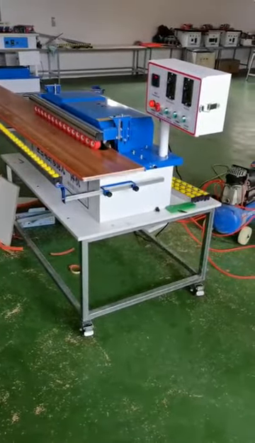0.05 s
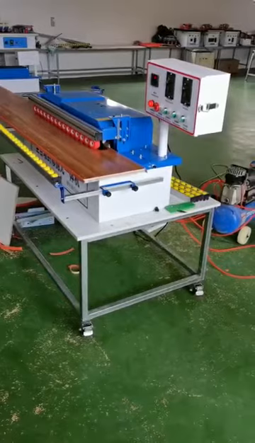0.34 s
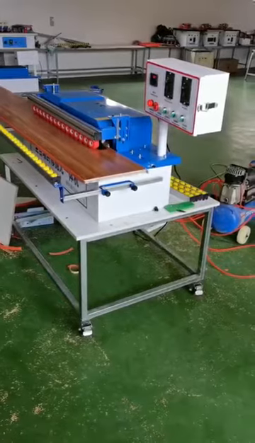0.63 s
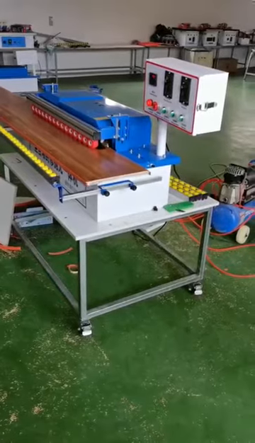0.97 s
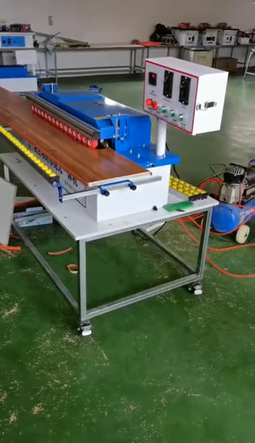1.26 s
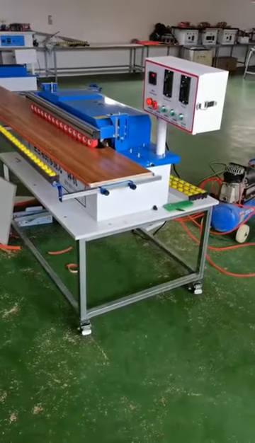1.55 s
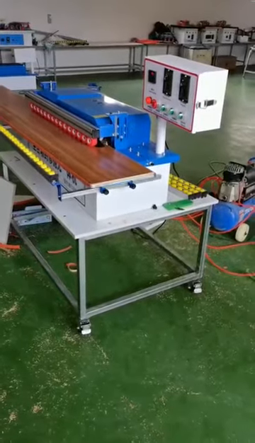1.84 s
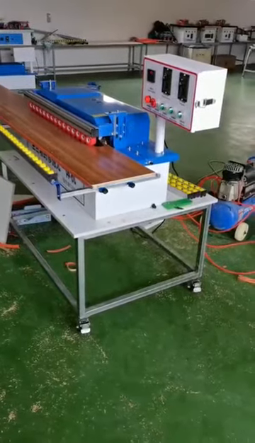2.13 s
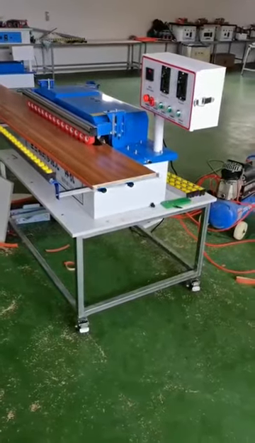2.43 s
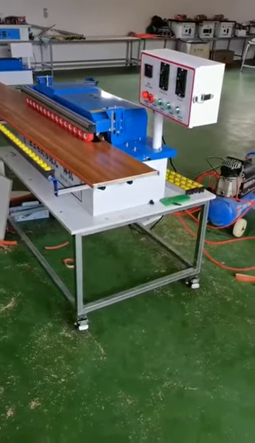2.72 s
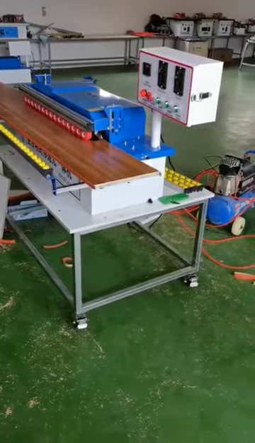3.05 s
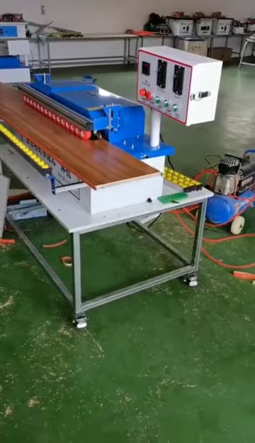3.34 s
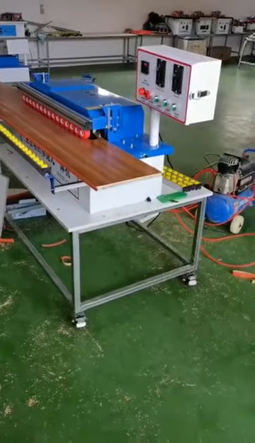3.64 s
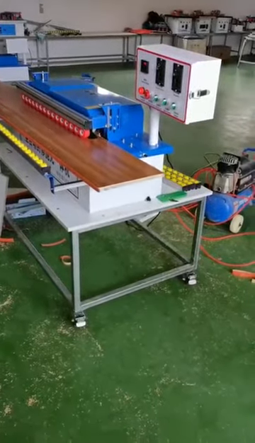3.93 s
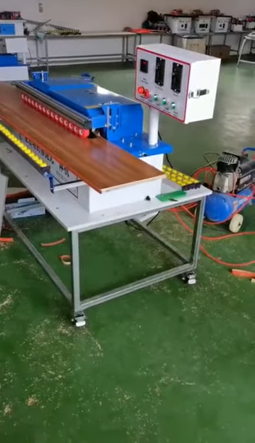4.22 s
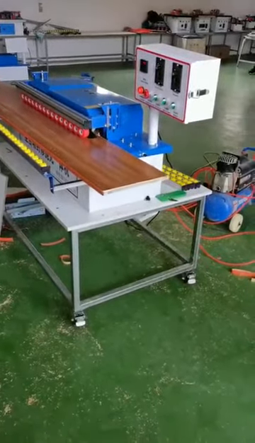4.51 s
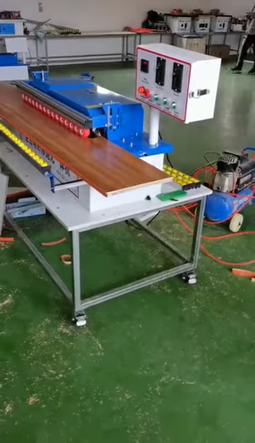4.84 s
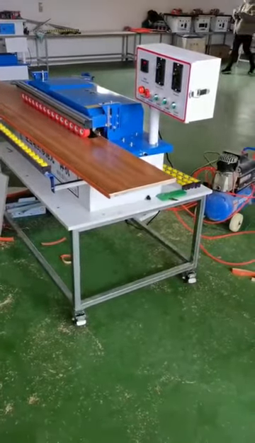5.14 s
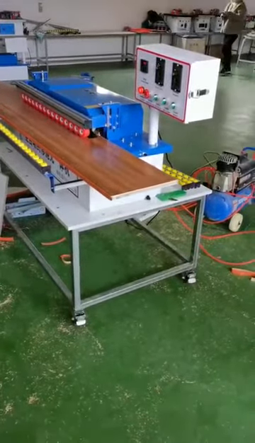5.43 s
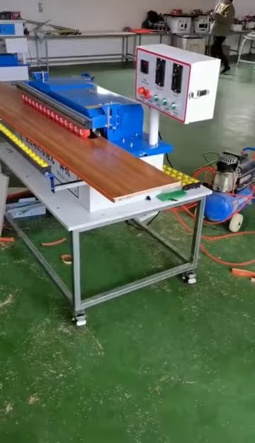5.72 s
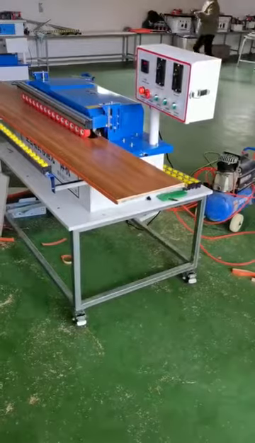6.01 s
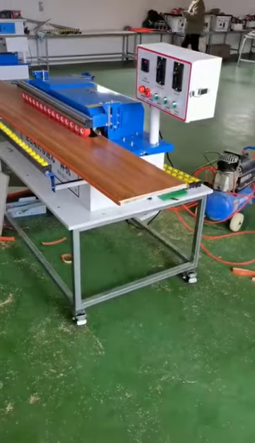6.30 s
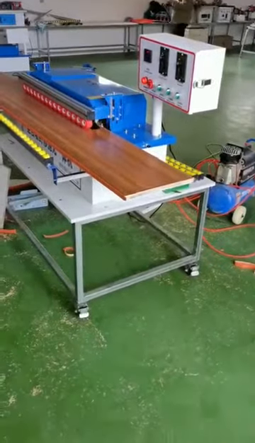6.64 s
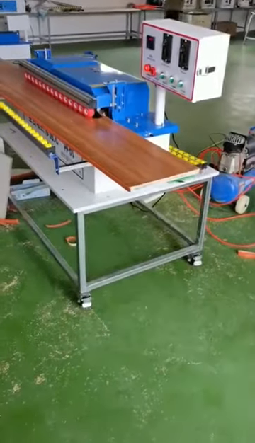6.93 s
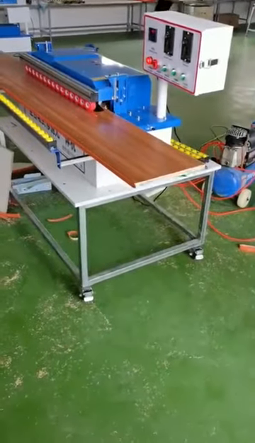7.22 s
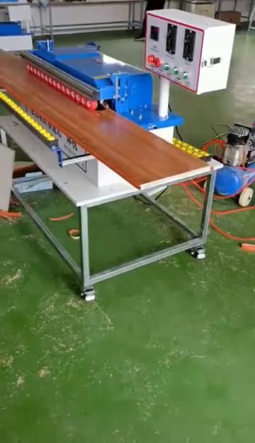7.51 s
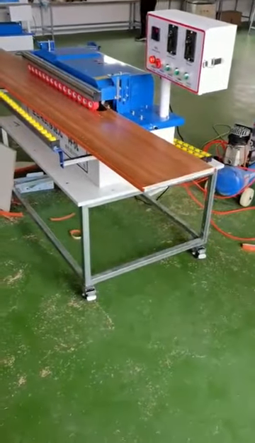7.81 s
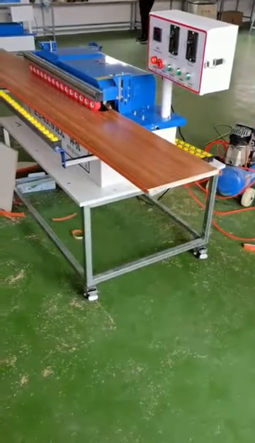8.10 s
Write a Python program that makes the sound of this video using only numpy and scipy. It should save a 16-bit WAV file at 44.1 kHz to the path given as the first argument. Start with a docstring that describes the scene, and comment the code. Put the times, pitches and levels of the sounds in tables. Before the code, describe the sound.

An edge banding machine runs throughout in a hard-walled workshop, heard from a hand-held phone. Two trimmer spindles whine at nearly the same pitch, beating against each other, with overtones that briefly swell and shift. From the start, one rasps along a wooden panel's edge, with a patchy hiss of chips and a rumble from the panel. Underneath, a low feed drone deepens and grows over the first 1.5 seconds, easing briefly between about 2 and 2.7 seconds. Around 4.5 to 4.8 seconds the whine sags in pitch under load, then partly recovers. Near 5.7 seconds the panel leaves the knives with a soft boom, and the rasp and feed drone fade away. The idling spindles keep whining with rushing cooling air and a slightly stronger electrical hum, swelling a little from 7 seconds to the end at about 8 seconds.

```python
"""Edge banding machine in a hard-walled workshop.

Two trimmer spindles whine and beat against each other, heard from a hand-held phone. One rasps along
a panel's edge, throwing chips, while the feed drones under load. The panel leaves the knives with a
soft boom near 5.7 s; idling spindles, cooling air and mains hum remain."""
import sys
import numpy as np
from scipy import signal
from scipy.fft import rfft, irfft, next_fast_len
from scipy.io import wavfile
from scipy.ndimage import uniform_filter1d

SR = 44100
rng = np.random.default_rng(int(sys.argv[2]) if len(sys.argv) > 2 else 0)


def persist_wave(psi):
    """Save psi, clipped to +-1, as 16-bit WAV."""
    counts = np.round(np.clip(psi, -1, 1) * 32767).astype(np.int16)
    wavfile.write(sys.argv[1], SR, np.atleast_2d(counts).T)


N = 359856
TIME = np.arange(N) / SR
STEP = 32  # samples per control step
SLOW_TIME = np.arange(N // STEP + 2) * STEP / SR
CUT_END_S, TOP_HZ = 5.72, 7680
SIDES, PORT_SPAN_S = np.array([[1], [-1]]), 0.00043  # left and right microphone ports

# Shaft speeds, sagging at peak load near 4.7 s.
# Each row: time in seconds, cutting trimmer in Hz, light trimmer in Hz.
SPEEDS = [(0, 393.3, 413.5), (.65, 390.5, 408), (1.6, 392.3, 407), (2.2, 395.6, 408), (2.9, 393.6, 410),
          (3.5, 390, 412.2), (4.08, 391.5, 413), (4.5, 380.5, 398), (4.75, 378, 395), (5.2, 385.5, 399.3),
          (5.55, 383.5, 400), (6.05, 388.7, 402.5), (7, 385, 400.2), (7.7, 385.8, 400),
          (8.16, 388.3, 402.5)]


def undb(db):
    """Decibels to gain."""
    return np.exp(np.asarray(db) * (np.log(10) / 20))


def curves(table):
    """Table columns, interpolated linearly in time."""
    times_s, *columns = np.transpose(table)
    return [np.interp(TIME, times_s, column) for column in columns]


def until(end_s, fade_s):
    """Smooth step from 1 to 0."""
    return .5 - .5 * np.tanh((TIME - end_s) / fade_s)


def blend(busy_db, idle_db, share):
    """Gain between working (share 1) and idling (share 0)."""
    return undb(share * busy_db + (1 - share) * idle_db)


def pan(db):
    """Port gains for a left-minus-right level."""
    gains = undb(SIDES * db / 2)
    return gains / np.sqrt(np.mean(gains ** 2, axis=0))


def drift(width_hz):
    """Smooth complex random motion: unit power, control rate."""
    count = len(SLOW_TIME)
    size = next_fast_len(count)
    hz = np.arange(size // 2 + 1) * SR / STEP / size
    spectrum = rfft(rng.standard_normal((2, size))) / (1 + (hz / width_hz) ** 2)
    real, imag = irfft(spectrum, size)[:, :count]
    return (real + 1j * imag) / np.sqrt(np.mean(real ** 2 + imag ** 2))


def swirl(width_hz):
    """Drift at the sample rate."""
    return np.interp(TIME, SLOW_TIME, drift(width_hz))


def walk(width_hz):
    """Real drift of unit spread."""
    return np.sqrt(2) * swirl(width_hz).real


def noise(colour, db, direct, pan_db, peaks=(), left_lead_s=0.00017):
    """Coloured noise: the direct part reaches the left port first, the hall comes from all sides."""
    size = next_fast_len(N)
    hz = np.arange(size // 2 + 1) * SR / size + 1e-3
    colour_hz, colour_db = np.transpose(colour)
    shape_db = np.interp(np.log(hz), np.log(colour_hz), colour_db)
    shape_db += sum(peak_db / (1 + (2 * (hz - centre_hz) / width_hz) ** 2)
                    for centre_hz, width_hz, peak_db in peaks)
    straight, mid, side = rfft(rng.standard_normal((3, size))) * undb(shape_db) * (hz < TOP_HZ)
    coherence = np.sinc(2 * hz * PORT_SPAN_S)
    hall = mid * np.sqrt((1 + coherence) / 2) + SIDES * side * np.sqrt((1 - coherence) / 2)
    lead = np.exp(1j * np.pi * hz * left_lead_s * SIDES)
    ports = irfft(hall + direct * straight * lead, size)[:, :N]
    return ports * undb(db) / np.std(ports) * pan(pan_db)


def mottle(sound, depth_db, width_hz, length_s):
    """Narrow bands of the noise swell and sink at random, giving a patchy, shifting texture."""
    size = 1024
    _, _, spectra = signal.stft(sound, nperseg=size)
    field = rng.standard_normal(spectra.shape[1:])
    for axis, span in enumerate((width_hz * size / SR, 2 * length_s * SR / size)):
        span = max(round(span), 1)
        field = uniform_filter1d(uniform_filter1d(field, span, axis=axis), span, axis=axis)
    gain = undb(depth_db * field / field.std())
    return signal.istft(spectra * gain / np.sqrt(np.mean(gain ** 2)), nperseg=size)[1][:, :N]


def idle_swell_db(start_s=7.08, db_per_s=2.5):
    """Late, steady rise in the level of the idling sounds."""
    return db_per_s * np.maximum(TIME - start_s, 0)


def knife_bite_db(surge_db=0.56, surge_hz=7.2):
    """Bite about its mean in the cut, surging as the grain varies."""
    # Each row: time in seconds, relative bite in dB.
    bite = [(0, -32.0), (0.17, -33.5), (0.45, -29), (0.8, -31.5), (1.2, -29), (1.55, -32.5), (2.08, -34),
            (2.55, -29.5), (3.0, -29), (3.45, -28.5), (3.8, -29.5), (4.2, -32), (4.55, -30), (5.05, -32),
            (5.62, -29.5)]
    db, = curves(bite)
    return db - db[TIME < CUT_END_S].mean() + surge_db * walk(surge_hz)


def shaft_order(turn, order, shaft_hz, sway, sway_hz, fray, swell=0, fray_hz=24, left_lead_s=0.00015):
    """One frayed shaft harmonic; standing waves shift its balance as the phone sways."""
    # Brief swells of single harmonics in the whine.
    # Each row: centre in seconds, half-width in seconds, order, lift in dB at swell=1.
    swells = [(0.223, 0.23, 4, 12.5), (1.25, .18, 5, 0.5), (2.304, 0.13, 4, 8), (2.56, 0.026, 3, 6),
              (2.72, 0.072, 4, 5.5), (3.254, 0.043, 3, 12.5), (3.45, 0.14, 5, 5.5), (3.936, 0.26, 4, 1),
              (4.45, .2, 6, 4.5), (4.728, 0.083, 4, 7), (5.1, 0.4, 5, 6.5), (5.9, .15, 6, 23),
              (6.52, .16, 4, 11), (7.2, 0.19, 4, 8.5), (7.97, .2, 4, 11)]
    hz = order * shaft_hz
    spread = np.sqrt(1 - np.sinc(2 * hz * PORT_SPAN_S))
    imbalance = sway * spread * drift(sway_hz)
    lead = np.exp(1j * np.pi * hz * left_lead_s * SIDES)
    line = (1 + SIDES * imbalance) * lead / np.sqrt(1 + abs(imbalance) ** 2)
    # The skirts reverberate, so they differ between ports.
    skirts = fray * (drift(fray_hz) + SIDES * spread * drift(fray_hz)) / np.sqrt(1 + spread ** 2)
    swell_db = swell * sum(db * np.exp(-((SLOW_TIME - at_s) / half_s) ** 2)
                           for at_s, half_s, on_order, db in swells if on_order == order)
    envelope = (line * undb(swell_db) + skirts * undb(swell_db / 2)) * np.sqrt(2 / (1 + fray ** 2))
    carrier = np.exp(1j * (order * turn + rng.uniform(0, 2 * np.pi)))
    return np.array([(np.interp(TIME, SLOW_TIME, port) * carrier).real for port in envelope])


def cutting_trimmer(turn, other_turn, load, bite_db, beat=0.38, panel_loose_s=5.165):
    """Unequal knives rasp and fray the upper orders; the other spindle shakes the same panel."""
    # Unbalance tone radiated by the clamped panel. Each row: time in seconds, relative level in dB.
    unbalance = [(0, -25.5), (0.8, -21.5), (1.08, -23.5), (1.3, -16.5), (1.6, -19.5), (2.5, -13),
                 (2.75, -16), (3.05, -12), (3.32, -20), (3.7, -10.5), (4.13, -20), (4.25, -17),
                 (4.34, -24.5), (4.44, -15), (5.05, -19)]
    # Its balance as the phone settles in standing waves. Each row: time in seconds, left minus right in dB.
    unbalance_pan = [(0, -5.5), (0.42, 11.5), (0.7, -17.5), (1.15, 1.5), (1.6, 0.0), (1.9, -4.0), (5, -3.5)]
    # Second order in the cut. Each row: time in seconds, relative level in dB.
    second_order = [(0, -22.5), (0.55, -15), (1.2, -19), (2.05, -30.5), (2.52, -36.5), (2.65, -24.5),
                    (3.35, -26), (4.5, -26), (4.8, -23.5), (5.6, -35)]
    # Rasp. Each row: shaft order, then relative dB in mid-panel, towards the panel end and idling.
    rasp_orders = [(3, -2.5, -7.5, -6), (5, 0.5, -2.5, -0.5), (6, -2.5, -3.5, -12), (7, -8, -9, -24),
                   (8, -14.5, -10.5, 2), (9, -18.5, -34, -26), (10, -24.5, -27, -19),
                   (11, -19.5, -18.5, -19), (12, -37, -33, -8.5), (16, -45, -39.5, -12)]
    # Knife chatter, settling as the spindle bogs down, then idles. Each row: time in seconds, share 0-1.
    chatter_shares = [(0, 0.88), (3.9, 0.86), (4.5, 0.54), (5.5, 0.54), (5.9, 0.35)]
    shaft_hz = curves(SPEEDS)[0]
    first_db, = curves(unbalance)
    pan_db, = curves(unbalance_pan)
    second_db, = curves(second_order)
    orders = [(1, blend(first_db - 0.86, -36.5, until(panel_loose_s, 0.078)) * pan(pan_db)),
              (2, blend(second_db - 0.2, -42, load) * pan(0.92)),
              (4, blend(-27 + 1.1 * bite_db, -39, until(panel_loose_s, 0.31)) * pan(-5.5))]  # knife tone
    ease_db = np.interp(TIME, [1.3, 3.0], [0, -6])
    strain_db = 0.27 * np.maximum(382.4 - shaft_hz, 0)  # harder rasp as the spindle bogs down
    rasp = blend(-21.5 + ease_db + strain_db + 1.62 * bite_db, -40 + idle_swell_db(), load)
    for order, middle_db, end_db, idle_db in rasp_orders:
        stage_db = np.interp(TIME, [1.5, 3.3, 5.5, 5.9], [middle_db, end_db, end_db, idle_db])
        orders.append((order, rasp * undb(stage_db) * pan(-2)))
    chatter = np.interp(SLOW_TIME, *np.transpose(chatter_shares))
    whine = 0
    for order, gain in orders:
        height = min(order / 4, 1)
        shake = beat * height ** 2 * load * np.cos(other_turn - turn + rng.uniform(0, 2 * np.pi))
        fray = (0.28 + .125 * (min(order, 8) - 1) * height) * chatter
        tone = shaft_order(turn, order, shaft_hz.mean(), sway=.5 * height, sway_hz=3.6, fray=fray, swell=1)
        whine += gain * (1 + shake) * tone
    return whine


def light_trimmer(turn, other_turn, load):
    """A steadier whine; the shared frame adds a tone at the sum of both shaft speeds."""
    # Upper harmonics. Each row: shaft order, base level in dB.
    upper_orders = [(3, -46.5), (6, -39), (8, -45), (16, -48)]
    shaft_hz = curves(SPEEDS)[1]
    mean_hz = shaft_hz.mean()
    orders = [(1, undb(-32) * pan(-5)), (2, undb(-41)), (4, undb(-37))]
    orders += [(order, undb(db)) for order, db in upper_orders]
    whine = sum(gain * shaft_order(turn, order, mean_hz, sway=0.88, sway_hz=1, fray=0.18 * order, swell=0.24)
                for order, gain in orders)
    load_db = load * (1.3 - np.maximum(395.8 - shaft_hz, 0))  # dips 1 dB per Hz in the deepest sag
    frame_db = -37.5
    contact = np.interp(TIME, [0, 2.4, 4, 5.7], undb([-32.5, 6, 4, 1]))
    frame = shaft_order(turn + other_turn, 1, 2 * mean_hz, sway=0.77, sway_hz=0.41, fray=1)
    return whine * undb(load_db + idle_swell_db()) + undb(frame_db) * contact * frame


def chips_and_panel(turn, load, bite_db, pulsing=0.29):
    """Chips hiss off the knives each turn while panel and hood rumble; the texture is patchy."""
    # Noise spectra. Each row: frequency in Hz, relative density in dB.
    chip_colour = [(900, -45.5), (1400, -0.5), (1800, 3.5), (2200, 4.5), (2500, -6.5), (3000, -35),
                   (3500, 0.5), (4300, -14), (5000, -9.5), (5600, -16), (6600, -9), (7600, -22.5)]
    panel_colour = [(25, -3), (45, -11.5), (85, 0), (130, -8.5), (270, -15.5), (400, 3.5), (490, -9.5),
                    (640, -8.5), (900, -8.5), (1080, 4), (1350, -2), (2000, -10), (4000, -33.5)]
    # Hood and guide resonances. Each row: centre in Hz, width in Hz, gain in dB.
    hood = [(542, 18, 4.5), (738, 27, 8.5), (870, 75, 11.5), (1070, 62, 1.5), (1510, 20, -4),
            (1740, 100, 0.5), (2480, 16, 7), (3250, 160, -17), (3740, 41, 7), (4043, 92, 10), (4100, 42, 6),
            (4526, 47, 13.5), (5200, 59, -7), (5030, 65, 6.5), (6470, 170, -14.5), (7420, 90, 14.5)]
    chips = noise(chip_colour, -26, direct=0.29, pan_db=-1, peaks=hood)
    chips *= 1 + pulsing * (np.cos(turn) + np.cos(2 * turn))
    panel = noise(panel_colour, -29.5, direct=0.5, pan_db=-5.5, peaks=hood)
    cut = chips * undb(1.53 * bite_db) + panel * undb(0.93 * bite_db)
    return load * mottle(cut, depth_db=2.6, width_hz=130, length_s=.06)


def feed_drive(rough=0.55, rough_hz=9, rise_db_per_s=3.5, full_s=1.5, free_s=5.62):
    """The drone slows and grows as the drive takes the panel, then fades as it runs free."""
    # Each row: time in seconds, drone pitch in Hz.
    pitch = [(0, 57.5), (.8, 55.5), (.92, 51.2), (1.33, 51), (1.6, 45.7), (3.5, 45.6), (5.3, 49.2)]
    hz, = curves(pitch)
    slack = until(2.73, .06) - until(1.91, .04)  # briefly runs light
    db = -36.5 + rise_db_per_s * np.minimum(TIME, full_s) - 9.5 * slack
    drone = np.exp(2j * np.pi * np.cumsum(hz) / SR) * (1 + rough * swirl(rough_hz))
    return np.sqrt(2) * drone.real * undb(db) * until(free_s, .2)


def mains_hum(load, idle_lift_db=5):
    """Motors and heater hum, louder after the cut."""
    # Each row: frequency in Hz, base level in dB.
    harmonics = [(50, -52), (100, -69.5), (200, -40.5), (300, -58), (500, -62), (600, -57)]
    waver = undb(.6 * walk(2.5))
    hum = sum(undb(db) * np.sin(2 * np.pi * hz * TIME + rng.uniform(0, 2 * np.pi)) for hz, db in harmonics)
    return np.sqrt(2) * hum * waver * undb(idle_lift_db * (0.5 - load)) * pan(1.6)


def cooling_air(load, loaded_db=-5):
    """Air rushes through both spindles and rings in their housings."""
    # Rush spectrum. Each row: frequency in Hz, relative density in dB.
    colour = [(20, -7.5), (45, 5), (70, -3.5), (130, -2.5), (210, 2), (280, -4), (400, -3), (620, -10.5),
              (780, -2), (1300, 1.5), (2400, -2.5), (4200, -3.5), (5600, -14.5), (7600, -17)]
    # Each row: centre in Hz, width in Hz, gain in dB.
    housings = [(709, 100, 8.9), (1050, 17, 6.6), (1523, 40, 1.4),
                (2180, 520, 5.2), (2730, 49, 7.8), (5230, 75, 3.8)]
    rush = noise(colour, -27.5, direct=0.6, pan_db=-0.5, peaks=housings)
    rush = mottle(rush, depth_db=2.5, width_hz=110, length_s=.09)
    return rush * undb(loaded_db * load + idle_swell_db())


def panel_release(at_s=5.66, half_width_s=0.18, db=-30.5):
    """The panel booms softly as its end leaves the knives."""
    # Each row: frequency in Hz, relative density in dB.
    colour = [(60, -8), (170, -17), (220, -0.5), (260, -7), (500, -13.5), (1200, -49), (5000, -46.5)]
    return noise(colour, db, direct=0.57, pan_db=0) * np.exp(-((TIME - at_s) / half_width_s) ** 2)


def scene():
    """Both spindles, the cut, the feed and the background."""
    cutting_turn, light_turn = (2 * np.pi * np.cumsum(hz) / SR for hz in curves(SPEEDS))
    load, bite_db = until(CUT_END_S, 0.08), knife_bite_db()
    whine = cutting_trimmer(cutting_turn, light_turn, load, bite_db)
    whine += light_trimmer(light_turn, cutting_turn, load)
    cut = chips_and_panel(cutting_turn, load, bite_db)
    return whine + cut + feed_drive() + panel_release() + mains_hum(load) + cooling_air(load)


def record(dry, ceiling=.88):
    """The phone rounds the highest peaks and cuts the top steeply."""
    rounded = dry / (1 + (dry / ceiling) ** 8) ** (1 / 8)
    return signal.sosfilt(signal.ellip(12, .1, 85, TOP_HZ, fs=SR, output="sos"), rounded)


dry = scene()
out = record(dry)
persist_wave(out)
```